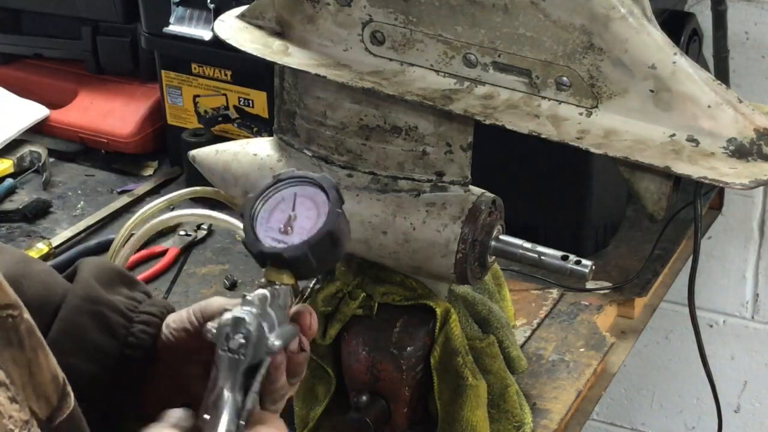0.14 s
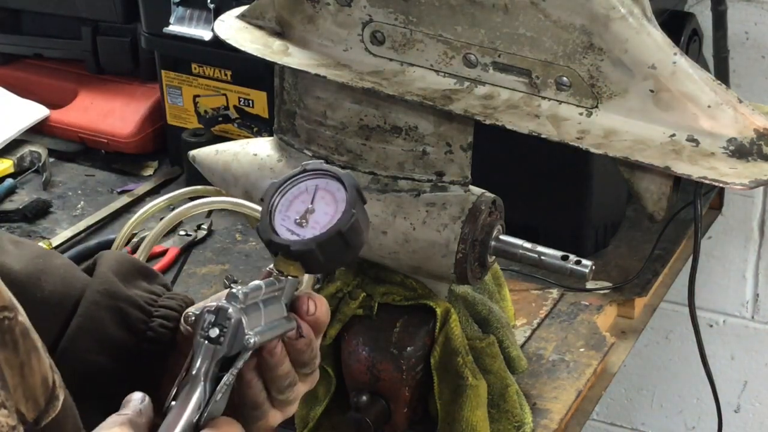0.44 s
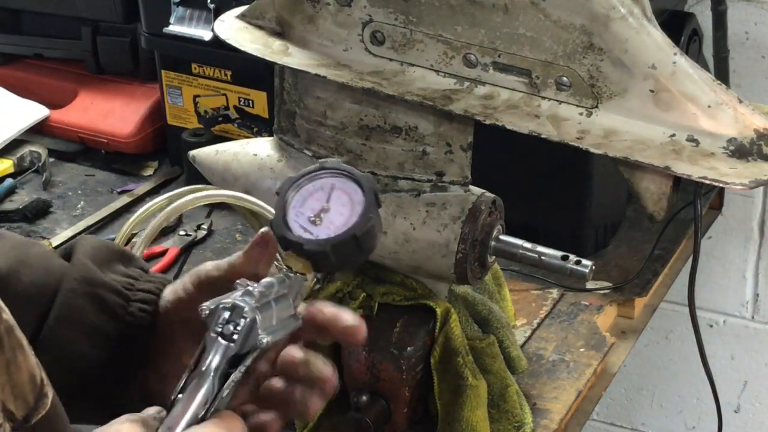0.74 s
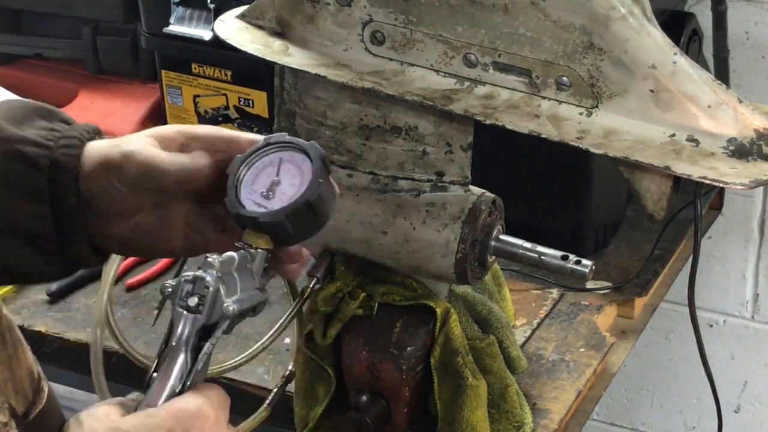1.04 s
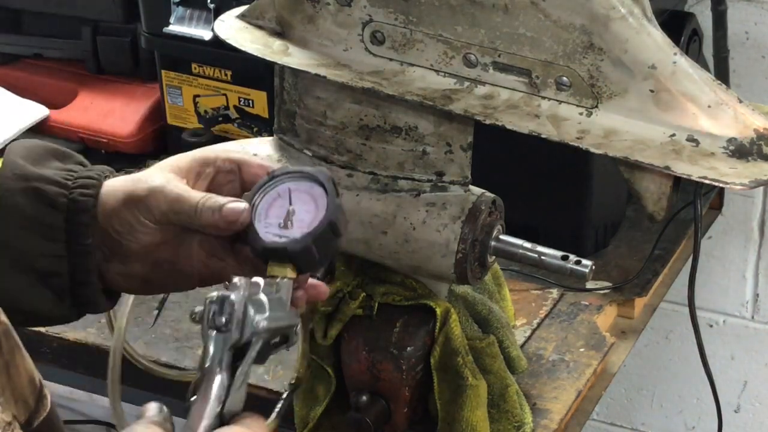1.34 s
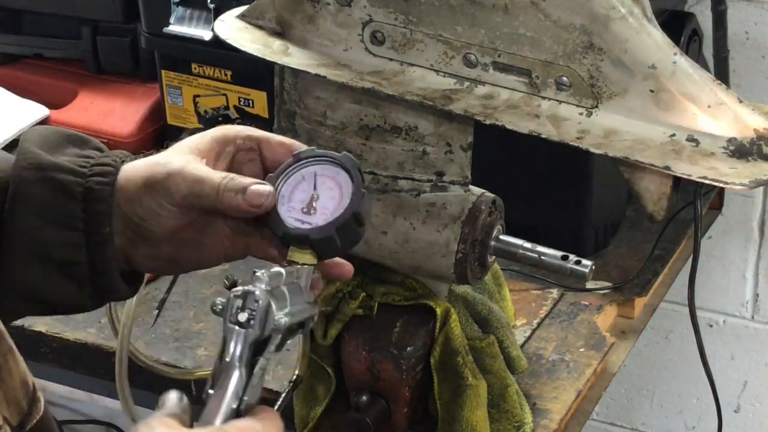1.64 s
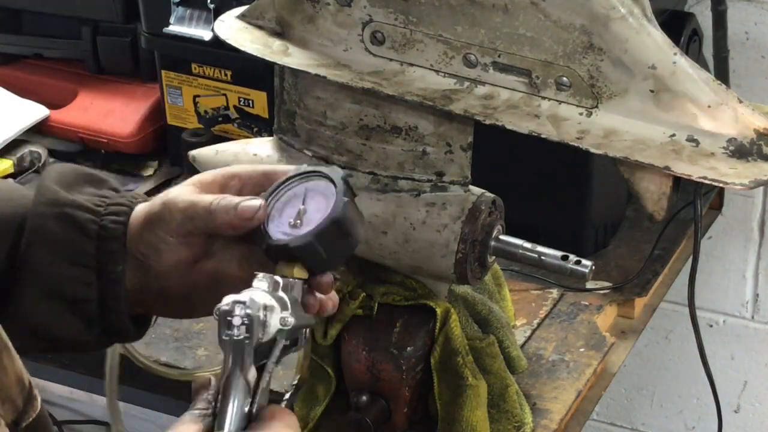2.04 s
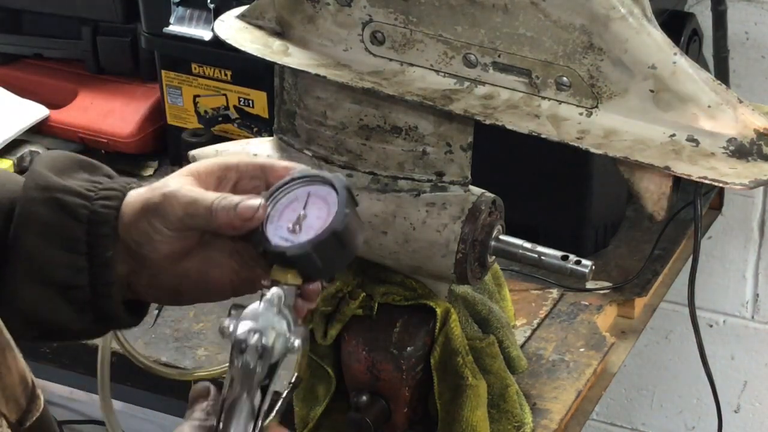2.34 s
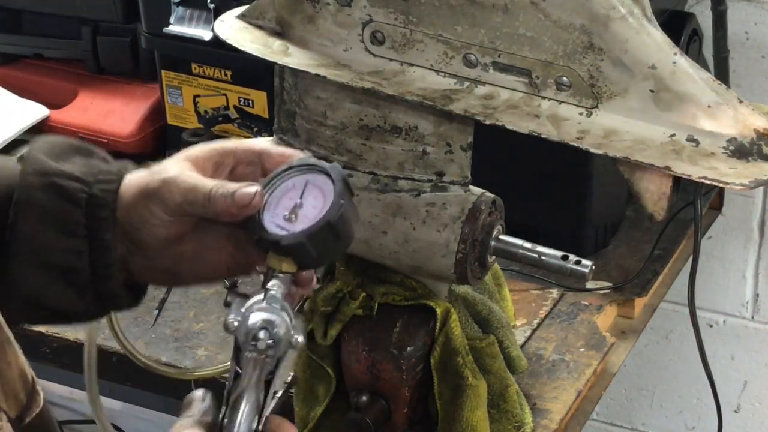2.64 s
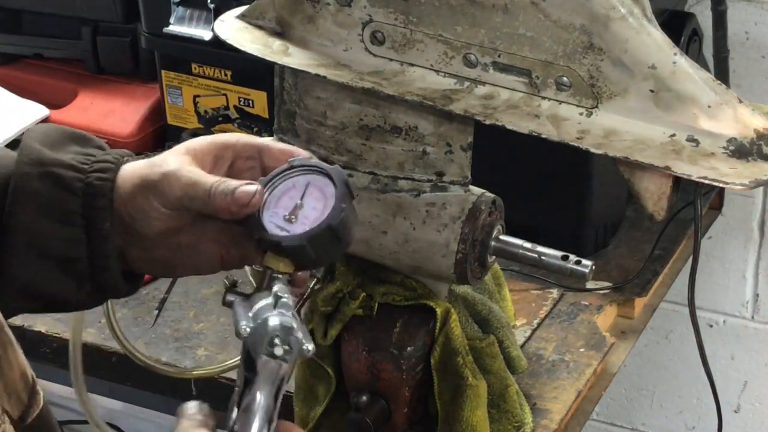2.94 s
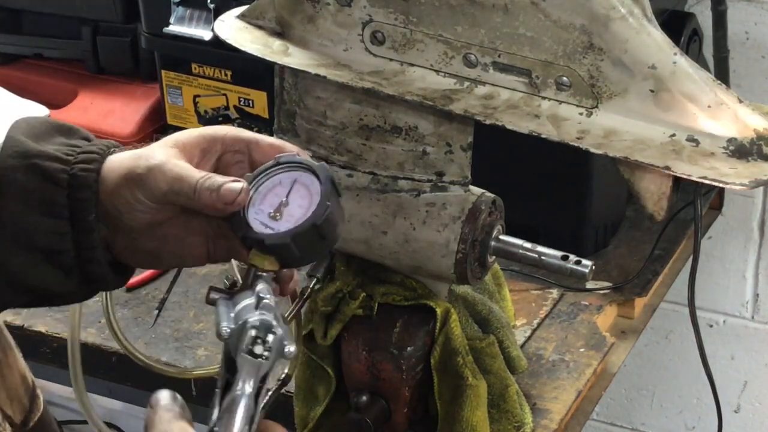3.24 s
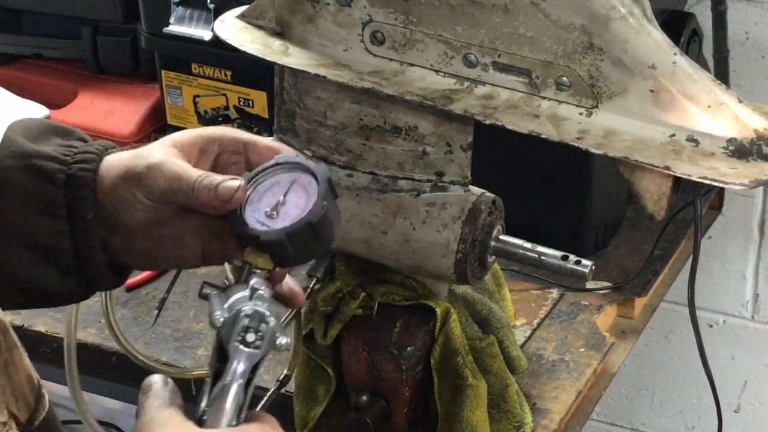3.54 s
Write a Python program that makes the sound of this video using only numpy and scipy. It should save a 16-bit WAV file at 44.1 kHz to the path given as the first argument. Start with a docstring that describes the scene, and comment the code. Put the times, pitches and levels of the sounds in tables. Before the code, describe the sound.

Hand-operated vacuum pump clacking quickly in a quiet workshop, following a short whistling air release

```python
"""A metal hand vacuum pump is worked in a quiet workshop, close to the microphone, its echo far below it.
Each squeeze rubs, then ends in a smeared clack of noise grains ringing in the body, a handle boom and a room tail.
Shaped noise puffs from the valve after each clack, more softly as the piston springs back.
Early on air hisses and whistles in; now and then, from the release on, the loose lever knocks, chirps and ticks.
The room adds a low rumble, hiss and a wavering hum."""
import sys
import numpy as np
from scipy import signal
from scipy.fft import rfft, irfft
from scipy.io import wavfile

SR = 44100
rng = np.random.default_rng(int(sys.argv[2]) if len(sys.argv) > 2 else 0)


def transcribe(u):
    """Save the signal u as a 16-bit wav file named by the first command-line argument.

    u: samples, shape (n,) or (channels, n), limited to [-1, 1]; the rate is SR.
    q: integer samples, one column per channel.
    """
    v = np.clip(np.atleast_2d(u).T, -1, 1)
    q = np.round(v * 32767).astype(np.int16)
    wavfile.write(sys.argv[1], SR, q)


def amplitude_ratio(level_db):
    """Convert a level in decibels to the matching linear amplitude (field) ratio."""
    exponent = np.asarray(level_db, float) / 20
    return 10 ** exponent


N = 163170
T = np.arange(N) / SR

# Squeezes of the pump: (clack time [s], clack level [dB], handle boom over clack [dB],
# linkage ring over clack [dB], rise plus fall time constant [s], puff lag [s], puff level [dB])
SQUEEZES = [(-.004, -42, 6, -8, 0.012, 0.014, -45.5), (1.14, -37, -1.5, -11, 0.011, 0.016, -38),
            (1.442, -40, -0.5, -12, 0.011, 0.013, -41.5), (1.722, -40.5, -0.5, -13, 0.011, 0.016, -41.5),
            (1.995, -41.5, 0, -18, 0.011, .017, -41.5), (2.277, -42, 1, -21, 0.011, 0.015, -41),
            (2.55, -43, 1, -27, 0.012, 0.016, -42), (2.801, -40, -1.5, -15, .013, 0.017, -43),
            (3.063, -40, -0.5, -13.5, 0.012, 0.015, -42.5), (3.326, -38, -0.5, -13.5, 0.0098, 0.015, -43.5),
            (3.577, -38, -3, -14.5, 0.013, .017, -42.5)]
CLACK_S, CLACK_DB, BOOM_DB, RING_DB, CLACK_LENGTH_S, PUFF_LAG_S, PUFF_DB = np.transpose(SQUEEZES)
CLACK_RISE_S, CLACK_FALL_S = 0.6 * CLACK_LENGTH_S, (1 - 0.6) * CLACK_LENGTH_S
NEAREST = np.searchsorted((CLACK_S[1:] + CLACK_S[:-1]) / 2, T)   # index of the nearest clack


def rms_one(x):
    """Scale to rms 1."""
    return x / np.sqrt(np.mean(x ** 2) + 1e-20)


def swell(at, db, rise, fall):
    """Sum of rounded swells: exponential rise to each time, exponential fall after it."""
    total = 0
    for s, d, r, f in np.broadcast(at, db, rise, fall):
        rising = np.exp(np.minimum((s - T) / r, 50))
        falling = np.exp(np.minimum((T - s) / f, 50))
        total = total + amplitude_ratio(d) * 2 / (rising + falling)
    return total


def hiss(spectrum):
    """Noise with the given spectrum, straight in dB over log frequency, rms 1."""
    hz, db = np.transpose(spectrum)
    log_hz = np.log(np.arange(N // 2 + 1) * SR / N + 1)
    gain = amplitude_ratio(np.interp(log_hz, np.log(hz), db))
    return rms_one(irfft(rfft(rng.standard_normal(N)) * gain, N))


def drift(rate):
    """Slow chance: noise through two equal low-pass poles at rate [Hz], rms 1."""
    r = np.exp(-2 * np.pi * rate / SR)
    noise = rng.standard_normal(N + SR)
    return rms_one(signal.lfilter([1], [1, -2 * r, r * r], noise)[SR:])   # first second settles the filter


def resonate(x, peaks):
    """Parallel two-pole resonances (Hz, width Hz, dB) with alternating signs."""
    out = 0
    for k, (hz, width, db) in enumerate(peaks):
        r = np.exp(-np.pi * width / SR)
        top = [(1 - r * r) / 2, 0, (r * r - 1) / 2]
        bottom = [1, -2 * r * np.cos(2 * np.pi * hz / SR), r * r]
        out = out + (-1) ** k * amplitude_ratio(db) * signal.lfilter(top, bottom, x + 1e-18)
    return out


def ring_grains(shape, peaks, hits=0):
    """Dense uneven noise grains and single hits ring in a body; shape may have a row per resonance."""
    grains_per_s, spread_db = 3500, 2.2
    grains = (rng.random(N) < grains_per_s / SR) * rng.choice([-1, 1], N)
    grains = grains * amplitude_ratio(spread_db * np.minimum(rng.exponential(1, N), 4))
    shapes = np.broadcast_to(shape, (len(peaks), N))
    rings = 0
    for k, peak in enumerate(peaks):
        rings = rings + (-1) ** k * resonate((grains + hits) * shapes[k], [peak])
    return rings / np.std(resonate(grains, peaks))   # level set by the steady shower of grains


def whistle(hz, width_hz):
    """A noise band around a centre that may move, rms 1."""
    low_pass = signal.butter(2, width_hz / 2, fs=SR, output="sos")
    slow = signal.sosfilt(low_pass, rng.standard_normal((2, N)))
    turn = 2 * np.pi * np.cumsum(hz) / SR
    return rms_one(slow[0] * np.cos(turn) + slow[1] * np.sin(turn))


def background():
    """Workshop rumble and hiss as shaped noise, with a low sine hum that wavers in pitch."""
    # Room noise spectrum: (frequency [Hz], relative level per Hz [dB])
    floor_spectrum = [(13, -74), (22, -42), (36, -12), (59, -5.5), (92, -6.5), (228, -15), (335, -23.5),
                      (364, -23), (395, -25.5), (764, -29), (926, -28.5), (1440, -35), (15700, -47.5)]
    hum_hz = 52.4 * (1 + 0.061 * drift(3.16))
    hum = np.sin(2 * np.pi * np.cumsum(hum_hz) / SR) * amplitude_ratio(-57.5)
    return amplitude_ratio(-59) * hiss(floor_spectrum) + hum


def slide_and_land(over_db, slide_db):
    """Level of every squeeze: the piston rubs in a slower, softer swell, then lands in a sharp one."""
    db = CLACK_DB + over_db
    land = swell(CLACK_S, db, CLACK_RISE_S, CLACK_FALL_S)
    return land + swell(CLACK_S, db + slide_db, 0.02, CLACK_FALL_S)


def landing_hits():
    """One hit at each landing after time zero, set over the lightest grain of the shower."""
    hits = np.zeros(N)
    hits[(CLACK_S[CLACK_S > 0] * SR).astype(int)] = amplitude_ratio(6.5)
    return hits


def body_clack():
    """A smeared clack: dense noise grains and single hits ring in the pump body, coloured anew each time."""
    # Pump body resonances: (frequency [Hz], width [Hz], relative level [dB])
    body_modes = [(1130, 620, -10.5), (2134, 223, 0.5), (2435, 206, -2), (2960, 180, -0.5),
                  (3598, 220, 3.5), (3896, 240, 2), (4054, 183, 1), (4426, 300, -6.5)]
    colour_db = 1.3 * rng.standard_normal((len(CLACK_S), len(body_modes)))
    colour = amplitude_ratio(colour_db)[NEAREST].T
    return ring_grains(colour * slide_and_land(0, -16), body_modes, landing_hits())


def handle_boom():
    """Low handle modes swell and die with each blow, scattered in level and phase."""
    # Handle modes: (frequency [Hz], level within the boom [dB])
    handle_modes = [(205, -16), (270, -21.5), (345, -11.5), (450, -14.5), (535, -8.5), (620, -8),
                    (685, -7.5), (755, -10), (805, -8), (865, -13), (1150, -15.5), (1320, -8.5),
                    (1445, -10.5)]
    spread_db, scatter_cycles = 1.8, 0.22
    phase = rng.standard_normal((len(CLACK_S), len(handle_modes)))
    spread = rng.standard_normal((len(CLACK_S), len(handle_modes)))
    boom = 0
    for k, (hz, db) in enumerate(handle_modes):
        cycles = hz * (T - CLACK_S[NEAREST]) + scatter_cycles * phase[NEAREST, k]
        boom = boom + amplitude_ratio(db + spread_db * spread[NEAREST, k]) * np.cos(2 * np.pi * cycles)
    return boom * slide_and_land(BOOM_DB, -20.5)


def linkage_ring():
    """Noise grains and single hits of the same kind ring brightly in the linkage."""
    # Linkage resonances: (frequency [Hz], width [Hz], relative level [dB])
    link_modes = [(5180, 550, 11), (7000, 2800, 3)]
    return ring_grains(slide_and_land(RING_DB, -16), link_modes, landing_hits())


def clack_tail():
    """The room's diffuse tail after each clack: shaped noise, wavering in level and dying."""
    # Tail spectrum: (frequency [Hz], relative level per Hz [dB])
    tail_spectrum = [(180, -31), (300, -5.5), (675, -3), (862, -2.5), (993, -11.5), (1390, 1),
                     (1770, -10.5), (2020, -8.5), (3600, -6), (6500, -18.5), (8450, -17), (14300, -120)]
    level = swell(CLACK_S + 0.0087, CLACK_DB - 14.5, CLACK_RISE_S, 0.052)
    return level * amplitude_ratio(1.1 * drift(17)) * hiss(tail_spectrum)


def valve():
    """Air as shaped noise: a puff after each clack, a seep, softer puffs as the piston returns and settles."""
    # Outlet puff spectrum: (frequency [Hz], relative level per Hz [dB])
    puff_spectrum = [(2940, -15.5), (5000, -13), (6060, -14), (6390, -12), (8480, -10), (9510, -5),
                     (10300, -4.5), (11200, -1.5), (14000, -12), (15700, -12)]
    # Spectrum of seep and return puffs: (frequency [Hz], relative level per Hz [dB])
    return_spectrum = [(3240, -42), (5500, -26), (8610, -7.5), (10200, -10.5), (12500, -8.5), (14900, -15),
                       (15700, -24)]
    # Puffs as the piston springs back: (time [s], level [dB], rise plus fall time constant [s])
    return_puffs = [(1.224, -57.5, .036), (1.541, -58.5, 0.03), (1.819, -61, 0.026), (2.095, -58, 0.026),
                    (2.378, -60, 0.022), (2.644, -59, 0.021), (2.899, -64, 0.019), (3.162, -59, 0.016),
                    (3.426, -59.5, 0.017), (3.68, -61, 0.014)]
    # Late little puffs as the piston settles: (time [s], level [dB])
    settle_puffs = [(1.283, -64), (1.585, -71)]
    # Band of the settling puffs: (centre [Hz], width [Hz], relative level [dB])
    settle_band = [(8350, 3000, 0)]
    puff_s, puff_rise_s = CLACK_S + PUFF_LAG_S, 0.012
    puff = swell(puff_s, PUFF_DB, puff_rise_s, 0.0092) * hiss(puff_spectrum)
    seep = swell(puff_s, PUFF_DB - 24.5, puff_rise_s, 0.049)
    back_s, back_db, length = np.transpose(return_puffs)
    back = swell(back_s, back_db, 0.56 * length, (1 - 0.56) * length)
    settle_s, settle_db = np.transpose(settle_puffs)
    settle_air = rms_one(resonate(rng.standard_normal(N), settle_band))
    settle = swell(settle_s, settle_db, 0.0083, 0.0083) * settle_air
    return puff + (back + seep) * hiss(return_spectrum) + settle


def room(x):
    """Diffuse workshop echo: dying noise, treble dying sooner, well below the direct sound."""
    t60_s, treble_t60_s, split_hz = 0.48, 0.38, 5400
    t = T[:SR // 2]
    noise = rng.standard_normal((2, len(t)))
    low_pass = signal.butter(4, split_hz, fs=SR, output="sos")
    high_pass = signal.butter(4, split_hz, "high", fs=SR, output="sos")
    low = signal.sosfilt(low_pass, noise[0]) * amplitude_ratio(-60 * t / t60_s)
    high = signal.sosfilt(high_pass, noise[1]) * amplitude_ratio(-60 * t / treble_t60_s)
    tail = (low + high) * np.minimum(t / 0.0096, 1)   # the echo builds up over 9.6 ms
    return amplitude_ratio(-22) * signal.fftconvolve(x, tail / np.sqrt(np.sum(low ** 2)))[:N]


def release():
    """Air rushes through the opened vent: two broad drifting whistles among bands of hiss."""
    # Released air: (time [s], whistle level [dB], lower hiss over whistle [dB],
    # upper air over whistle [dB], whistle centre [Hz], upper whistle centre [Hz])
    air_course = [(0.09, -69, 4, 10, 8070, 12500), (0.102, -72, -7, 7, 8060, 12800),
                  (0.122, -52.5, -18, -3, 8080, 13000), (0.146, -52, -11, -4, 8280, 12900),
                  (0.21, -50.5, -12.5, -5, 8160, 12700), (0.233, -53.5, 6.5, -4, 7990, 12400),
                  (0.271, -53, -6, 3, 8370, 11700), (0.32, -58, -1, 2.5, 8350, 11500),
                  (0.411, -54, -5, -5, 8540, 10900), (0.589, -61, -4, 1.5, 8700, 11800),
                  (0.637, -59, -6, -3.5, 8430, 12000), (0.689, -82, 3, 2, 8200, 12100)]
    # Lower hiss spectrum: (frequency [Hz], relative level per Hz [dB])
    lower_spectrum = [(1410, -44), (2400, -25), (2780, -10), (3760, 3.5), (7000, -3.5), (9100, -27),
                      (15400, -120)]
    # Upper hiss spectrum: (frequency [Hz], relative level per Hz [dB])
    upper_spectrum = [(5880, -10.5), (10000, -15), (11200, -11), (14700, -6), (15700, -6)]
    # Shoulder under the whistle as the vent first opens: (centre [Hz], width [Hz], relative level [dB])
    rush_band = [(6700, 440, 0)]
    s, *columns = np.transpose(air_course)
    db, low_db, high_db, hz, upper_hz = [np.interp(T, s, c) for c in columns]
    upper = rms_one(hiss(upper_spectrum) + amplitude_ratio(-1) * whistle(upper_hz, 2300))
    air = whistle(hz, 1450) + amplitude_ratio(low_db) * hiss(lower_spectrum) + amplitude_ratio(high_db) * upper
    air = air * amplitude_ratio(db + 0.64 * drift(20)) * (T > s[0]) * (T < s[-1])
    rush = swell(0.126, -63, 0.008, 0.07) * rms_one(resonate(rng.standard_normal(N), rush_band))
    return rush + air


def spring_chirps():
    """Faint chirps and pings of spring and lever: short swells of noise bands."""
    # Chirps: (time [s], level [dB], centre [Hz], width [Hz], rise constant [s], fall constant [s])
    chirp_list = [(0.235, -49, 2050, 248, 0.01, 0.0067), (0.245, -63, 2030, 110, 0.015, 0.04),
                  (0.72, -69.5, 5640, 1300, 0.0084, .007), (2.22, -75, 14200, 300, 0.014, .0066),
                  (2.219, -59.5, 3010, 300, 0.003, 0.01)]
    out = 0
    for s, db, hz, width, rise, fall in chirp_list:
        out = out + swell(s, db, rise, fall) * whistle(np.full(N, hz), width)
    return out


def lever():
    """Short knocks of the loose lever: ringing noise grains, each knock with its own share of treble."""
    # Knocks: (time [s], level [dB], rise and fall constant [s], treble over the rest [dB])
    knock_list = [(0.238, -44.5, 0.007, -2.5), (0.718, -69.5, 0.0079, -9), (1.681, -51, 0.0086, -1),
                  (2.227, -68, 0.016, 0)]
    # Lever resonances: (frequency [Hz], width [Hz], relative level [dB])
    lever_modes = [(1130, 210, -3.5), (2050, 130, 2), (2650, 480, -4), (3420, 520, -6), (4540, 500, -9),
                   (5400, 340, 3), (7380, 560, 1), (10000, 650, -7.5), (11500, 550, -5.5),
                   (14200, 1500, -12)]
    treble_hz = 4000
    low = [mode for mode in lever_modes if mode[0] < treble_hz]
    high = [mode for mode in lever_modes if mode[0] >= treble_hz]
    s, db, half, treble_db = np.transpose(knock_list)
    body = ring_grains(swell(s, db, half, half), low)
    return body + ring_grains(swell(s, db + treble_db, half, half), high)


def valve_ticks():
    """Faint valve ticks between squeezes: a sine and a noise band in short swells."""
    # Ticks: (time [s], level [dB])
    tick_list = [(2.177, -66), (2.463, -74), (2.714, -64.5), (2.976, -70), (3.504, -71)]
    tick_hz, half_s = 5400, 0.0045
    s, db = np.transpose(tick_list)
    ping = np.sin(2 * np.pi * tick_hz * T) + whistle(np.full(N, tick_hz), 700.0)
    return swell(s, db, half_s, half_s) * ping


def scene():
    """Pump, its echo and the workshop."""
    clacks = body_clack() + handle_boom() + linkage_ring() + clack_tail()
    pump = clacks + valve() + release() + spring_chirps() + lever() + valve_ticks()
    return (pump + room(pump) + background())[None]


def top_cut(x):
    """Nothing passes above the cut-off."""
    return signal.sosfilt(signal.butter(12, 15890, fs=SR, output="sos"), x)


def record(dry):
    """The finished mix as it is stored."""
    return top_cut(dry)


dry = scene()
out = record(dry)
transcribe(out)
```